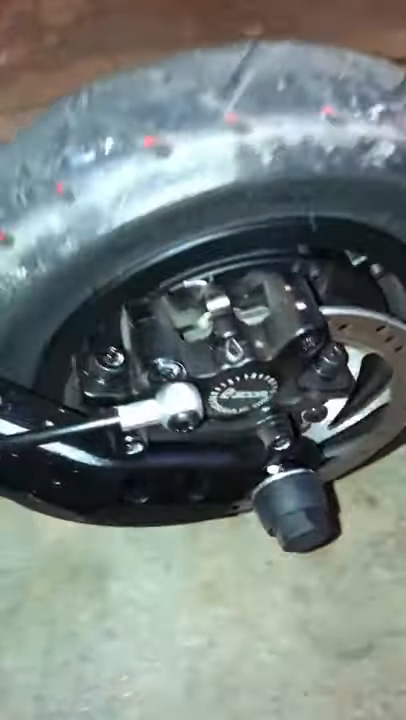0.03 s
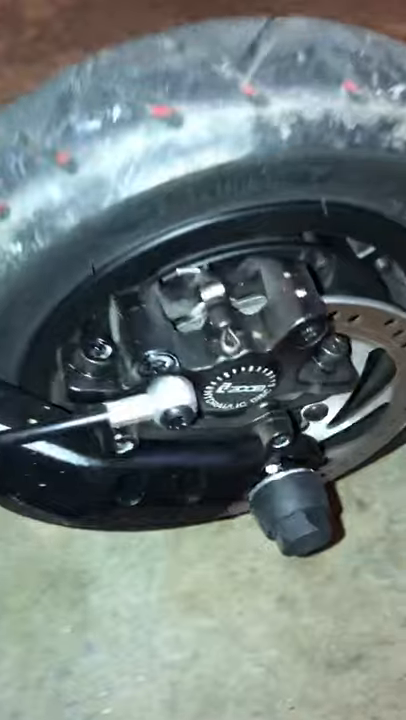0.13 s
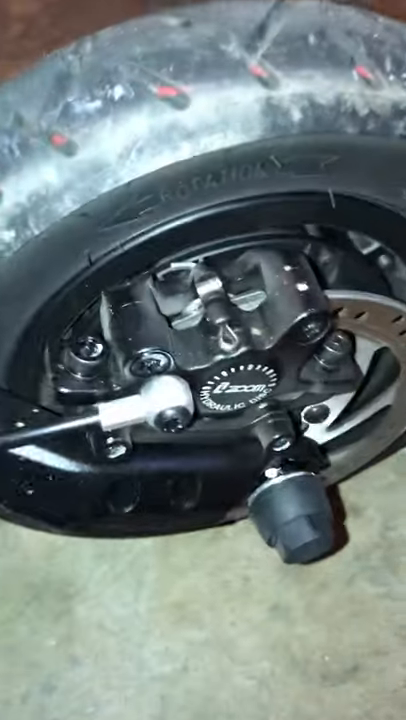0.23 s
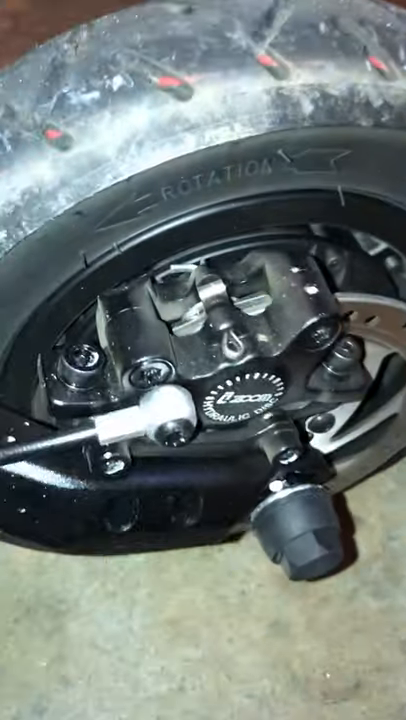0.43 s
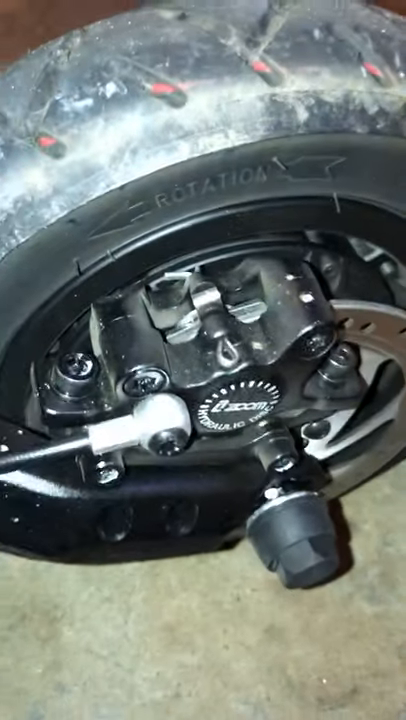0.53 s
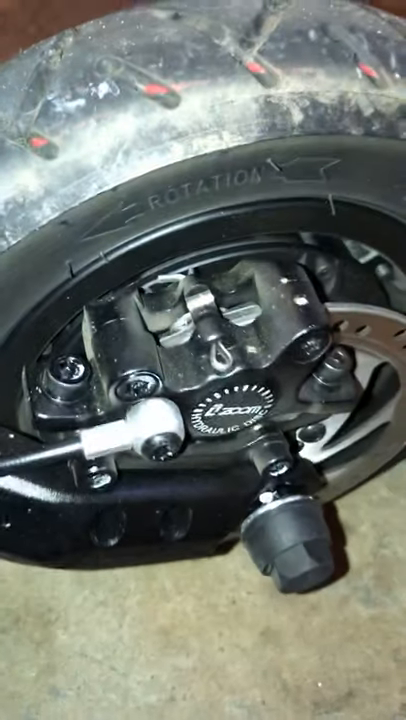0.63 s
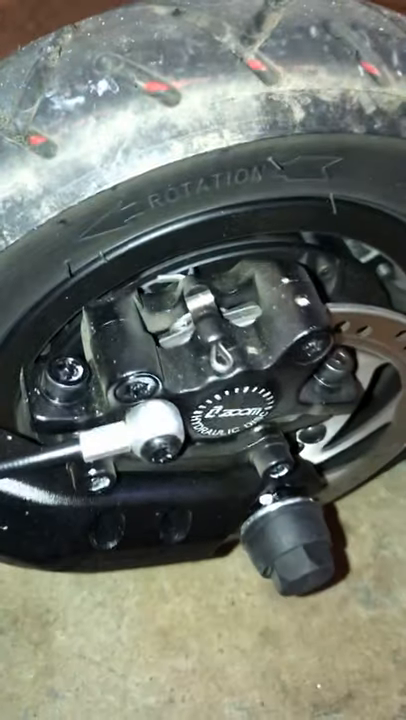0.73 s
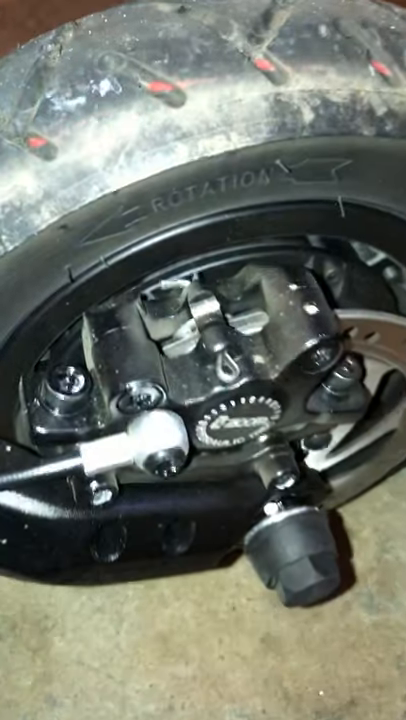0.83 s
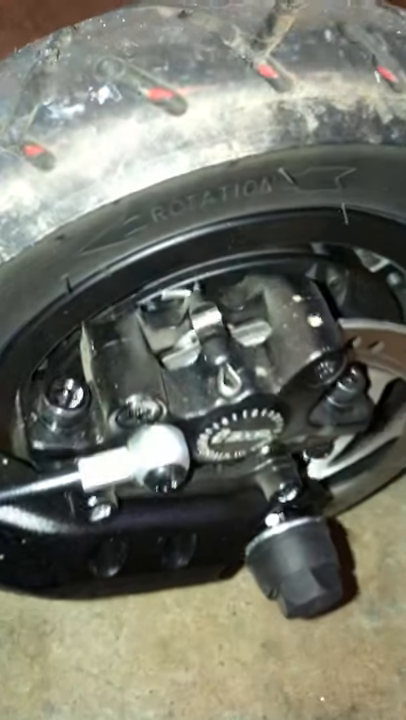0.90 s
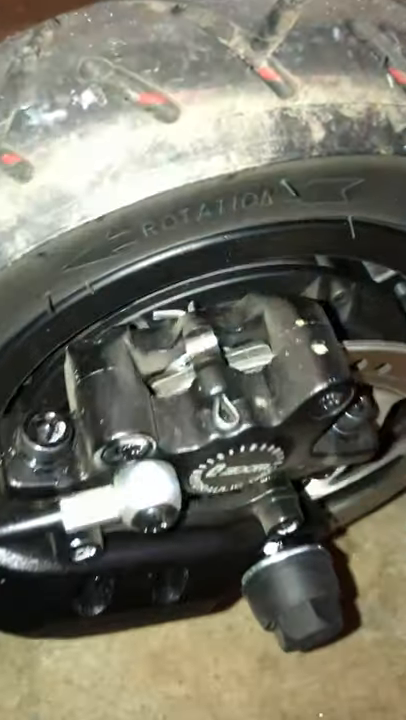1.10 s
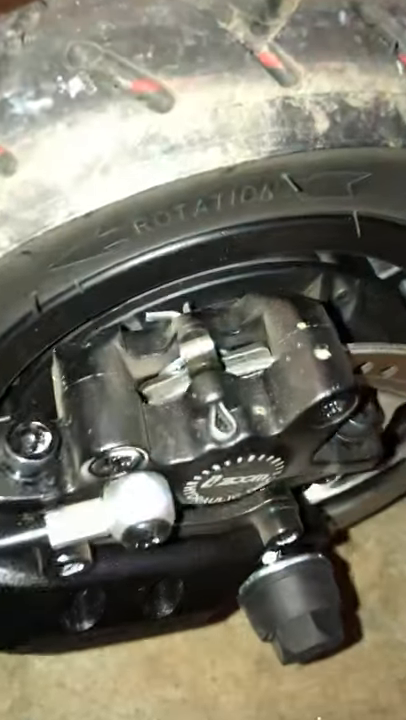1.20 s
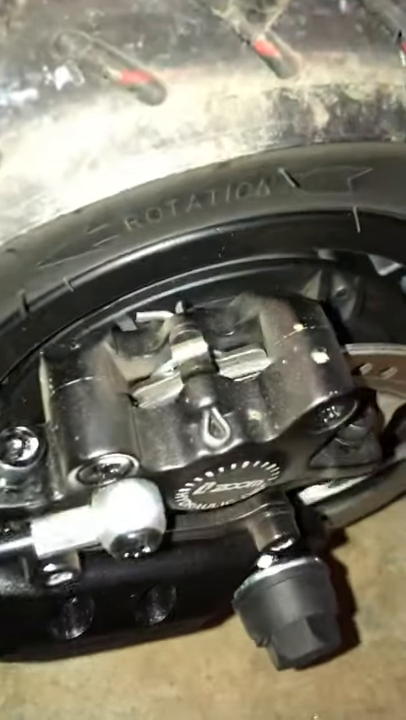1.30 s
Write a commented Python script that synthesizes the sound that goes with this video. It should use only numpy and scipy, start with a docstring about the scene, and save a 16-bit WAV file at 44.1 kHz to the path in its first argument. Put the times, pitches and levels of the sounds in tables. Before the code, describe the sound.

A disc brake gives one brief, high-pitched squeal in a quiet room.

```python
"""A scooter's disc brake squeals as the rear wheel coasts to a stop, close to the microphone in a quiet room.
The pad rubs softly, then catches the disc: friction drives one pure tone that swells, turns shrill
as the pad sticks and slips, sags in pitch as the disc slows, and rings out.
Behind it are a few soft handling bumps, low room hum, microphone hiss and a faint electrical sizzle."""
import sys
import numpy as np
from scipy import signal
from scipy.fft import rfft, irfft
from scipy.io import wavfile
from scipy.ndimage import uniform_filter1d

SR = 44100
rng = np.random.default_rng(int(sys.argv[2]) if len(sys.argv) > 2 else 0)


def unload_wav(signal):
    """Save mono or channel-first audio to the path in sys.argv[1] as 16-bit WAV at rate SR, clipped to [-1, 1]."""
    wavfile.write(
        sys.argv[1],
        SR,
        np.round(np.clip(np.atleast_2d(signal).T, -1, 1) * 32767).astype(np.int16),
    )


N = 59535
T = np.arange(N) / SR


def from_db(db):
    """Decibels to gain."""
    return 10 ** (np.asarray(db) / 20)


def in_time(rows):
    """Join (time_s, value) rows with straight lines."""
    return np.interp(T, *np.transpose(rows))


def shaped_noise(gain):
    """Noise shaped by a gain at each frequency; rms 1."""
    hz = np.arange(N + 1) * SR / (2 * N)
    noise = irfft(rfft(rng.standard_normal(2 * N)) * gain(hz))[:N]
    return noise / np.sqrt(np.mean(noise ** 2) + 1e-20)


def coloured(spectrum):
    """Noise shaped by (frequency_hz, relative_db) rows; rms 1."""
    hz, db = np.transpose(spectrum)
    return shaped_noise(lambda f: from_db(np.interp(np.log(f + 1), np.log(hz), db)) * (f > 10))


def drift(width_hz):
    """Random movement, mostly slower than width_hz; rms 1."""
    return shaped_noise(lambda f: 1 / (1 + (f / width_hz) ** 2))


def phase_of(hz):
    """Running phase of a moving pitch."""
    return 2 * np.pi * np.cumsum(hz) / SR


def disc_squeal():
    """Friction drives one disc mode; overtones burst in once it swings wide enough to stick and slip."""
    # Swing of the squealing mode: time_s, level_db
    swing = [(0, -73.5), (.11, -74.5), (.2, -48.5), (.23, -41), (.252, -32.5), (.27, -33), (.305, -33.5),
             (.332, -38.5), (.357, -59), (.41, -61.5), (.465, -72), (.495, -84.5), (.68, -84.5), (.9, -103)]
    # The tone sags as the disc slows, then rings free: time_s, pitch_hz
    pitch = [(0, 3367), (.2, 3360), (.25, 3355), (.295, 3351), (.32, 3341), (.334, 3325), (.347, 3348),
             (.6, 3351)]
    # Harmonics 2 to 4: full_slip_level_db, loss_db_per_db of swing short of full stick-slip
    overtones = [(-57, 1.5), (-48.5, 3), (-56, 4.5)]
    full_slip_db = -36.5
    waver_hz, shimmer_db, waver_width_hz = 1.5, 0.24, 60
    grit_db, grit_width_hz = -71, 190  # friction noise around each partial
    chatter_db, chatter_s, chatter_width_s = 7.5, .318, .016  # more grit as the pad lets go

    swing_db = uniform_filter1d(in_time(swing), size=600, mode="nearest")
    phase = phase_of(in_time(pitch) + waver_hz * drift(waver_width_hz))
    shortfall_db = np.logaddexp(0, full_slip_db - swing_db)
    levels_db = [swing_db] + [db - loss * shortfall_db for db, loss in overtones]
    chatter = np.exp(-.5 * ((T - chatter_s) / chatter_width_s) ** 2)
    roughness = from_db(grit_db + chatter_db * chatter)
    out = 0
    for harmonic, db in enumerate(levels_db, 1):
        grit = harmonic * roughness * (drift(grit_width_hz) + 1j * drift(grit_width_hz))
        partial = np.real((1 + grit) * np.exp(1j * harmonic * phase))
        out = out + from_db(db + shimmer_db * drift(waver_width_hz)) * partial
    return np.sqrt(2) * out


def pad_rub():
    """The pad's soft scrape stirs the brake's resonances and fades as the wheel slows."""
    # Pad on disc, over the low roll of the wheel: frequency_hz, relative_db
    rub_spectrum = [(30, 23), (60, 14.5), (200, -4), (500, 2.5), (900, 2), (1600, -3), (2600, 0.5),
                    (5000, -10.5), (9000, -7.5), (11000, -9.5), (16000, -9.5)]
    # Brake resonances before the fade: centre_hz, width_hz, level_db
    brake_modes = [(2660, 150, -79), (4383, 70, -89), (4530, 25, -80.5), (5930, 150, -79.5),
                   (7020, 70, -81), (9070, 240, -74), (12300, 500, -77.5)]
    hold_s, fade_db_per_s = 0.024, 42
    scrape = from_db(-63) * coloured(rub_spectrum)
    for hz, width_hz, db in brake_modes:
        scrape = scrape + from_db(db) * shaped_noise(lambda f: 1 / (1 + 2j * (f - hz) / width_hz))
    return scrape * from_db(-fade_db_per_s * np.maximum(T - hold_s, 0))


def handling_bumps():
    """Soft, dull thuds from handling, each dropping quickly to its own low pitch."""
    # One thud a row: start_s, peak_db, pitch_hz
    bumps = [(.020, -54, 120), (.040, -54.5, 73), (.315, -52.5, 102), (0.355, -54.5, 74),
             (0.423, -53.5, 120), (0.471, -62, 128), (1.114, -49, 128), (1.28, -55.5, 138),
             (1.309, -55, 90)]
    rise_s, drop_hz, drop_s = .0068, 500, .0026
    out = 0
    for start_s, db, hz in bumps:
        age_s = np.maximum(T - start_s, 0)
        cycles = hz * age_s + drop_hz * drop_s * (1 - np.exp(-age_s / drop_s))
        envelope = (age_s / rise_s * np.exp(1 - age_s / rise_s)) ** 2
        out = out + from_db(db) * envelope * np.sin(2 * np.pi * cycles)
    return out


def room_tail(source, gain_db=-33, t60_s=.55):
    """The room's diffuse reverberation, faint this close to the brake."""
    tail = rng.standard_normal(N) * np.exp(-np.log(1000) * T / t60_s)
    return from_db(gain_db) * signal.fftconvolve(source, tail / np.linalg.norm(tail))[:N]


def room_tone():
    """The quiet room: a low, wavering hum over rumble and air."""
    # Hum tones: pitch_hz, level_db
    hum_tones = [(53, -70), (120, -74)]
    # Rumble and air: frequency_hz, relative_db
    air_spectrum = [(20, -13), (35, -13), (55, 4), (85, -4.5), (140, -1.5), (220, -15), (350, -13),
                    (550, -19.5), (1000, -23.5), (2000, -30.5), (5000, -33.5), (16000, -38)]
    waver_db, waver_hz = 3.5, 2.56
    hum = 0
    for hz, db in hum_tones:
        amplitude = np.sqrt(2) * from_db(db + waver_db * drift(width_hz=5))
        hum = hum + amplitude * np.sin(phase_of(hz + waver_hz * drift(width_hz=9.3)))
    return hum + from_db(-64) * coloured(air_spectrum)


def microphone_hiss(level_db=-73.5):
    """The microphone's own steady noise."""
    # Noise floor: frequency_hz, relative_db
    hiss_spectrum = [(1000, -5), (3000, 0.5), (5000, -8), (7500, -6.5), (10500, -11), (12500, -2),
                     (15500, -2.5)]
    return from_db(level_db) * coloured(hiss_spectrum)


def electrical_sizzle():
    """Electrical pickup: short treble bursts that bunch twice in each fast cycle."""
    # Colour of the bursts: frequency_hz, relative_db
    sizzle_spectrum = [(9000, -20.5), (11000, -9), (12300, 3), (14000, -3.5), (15400, 7.5)]
    # Where bursts bunch in the cycle: offset_s, width_s, pull
    bunches = [(0.0198, 0.0025, 1.5), (0.0327, 0.0035, 1.3)]
    cycle_hz, threshold = 30, 1.2
    activity = drift(width_hz=260)
    for offset_s, width_s, pull in bunches:
        apart_cycles = ((T - offset_s) * cycle_hz + .5) % 1 - .5
        activity = activity + pull * np.exp(-.5 * (apart_cycles / cycle_hz / width_s) ** 2)
    gate = .5 + .5 * np.tanh(activity - threshold)
    return from_db(-64) * gate * coloured(sizzle_spectrum)


def electrical_ticks(first_s=.1012, every_s=.1024, peak_db=-51):
    """Faint, regular electrical ticks, each one sharp up-and-down spike."""
    pulses = np.zeros(N)
    pulses[(np.arange(first_s, T[-1], every_s) * SR).astype(int)] = from_db(peak_db)
    return np.diff(pulses, prepend=0)


def scene():
    """The brake up close with the room behind it, on one microphone."""
    brake = disc_squeal() + pad_rub()
    at_microphone = brake + room_tail(brake) + handling_bumps() + room_tone()
    return (at_microphone + microphone_hiss() + electrical_sizzle() + electrical_ticks())[None]


def record(dry, cutoff_hz=15850):
    """A steep low-pass cuts off the highest treble."""
    return signal.sosfilt(signal.ellip(12, .1, 70, cutoff_hz, fs=SR, output="sos"), dry)


dry = scene()
out = record(dry)
unload_wav(out)
```